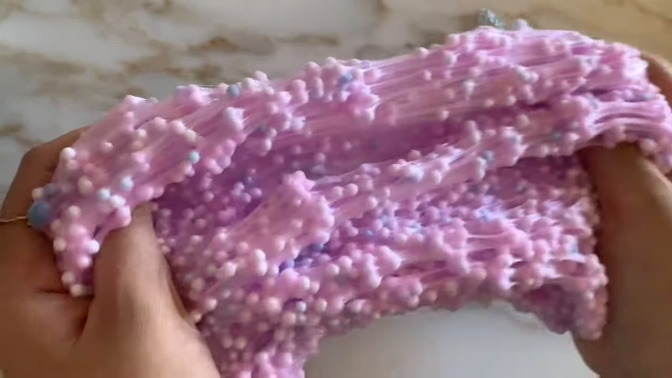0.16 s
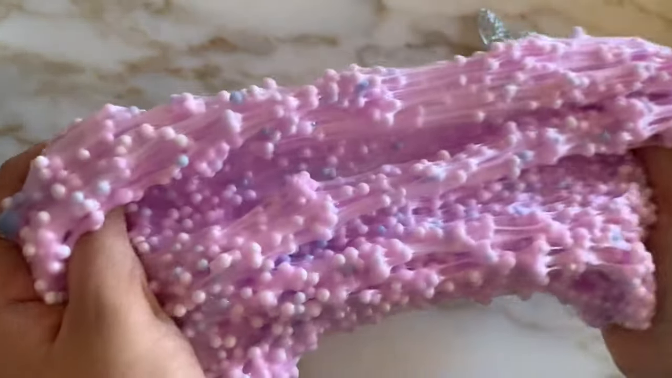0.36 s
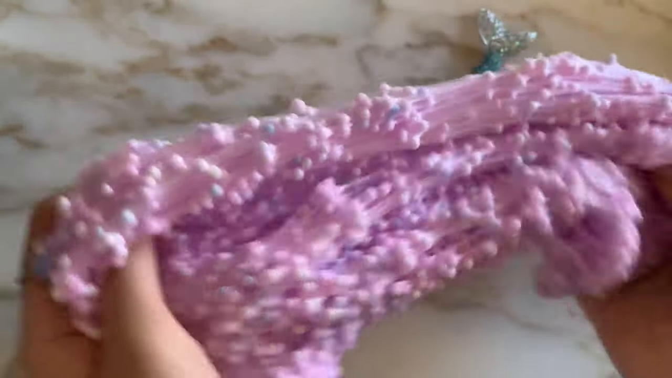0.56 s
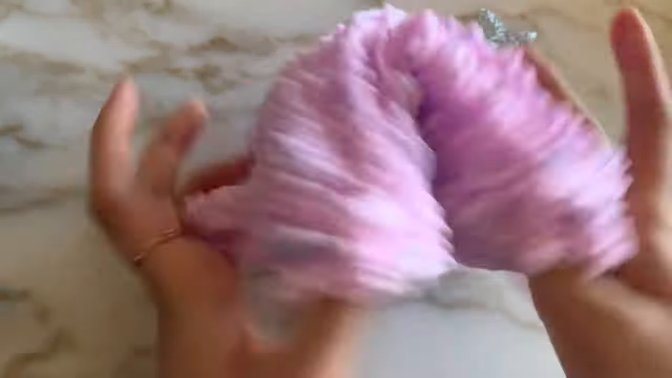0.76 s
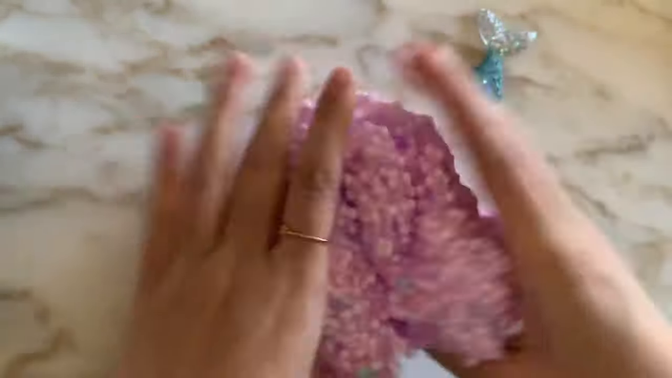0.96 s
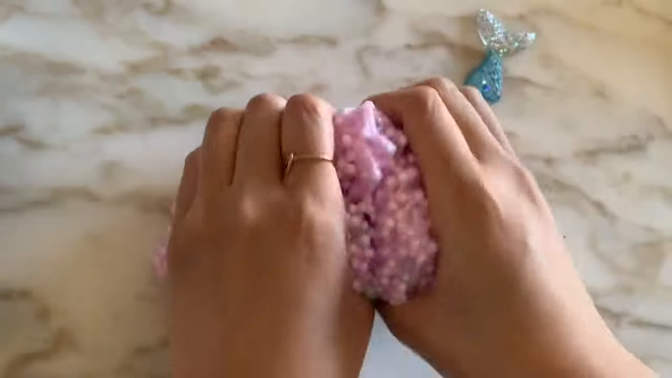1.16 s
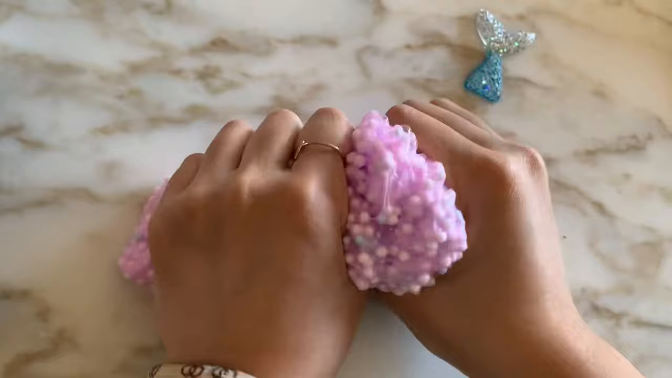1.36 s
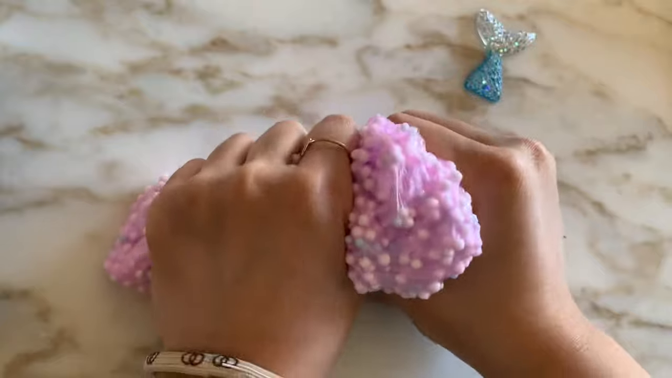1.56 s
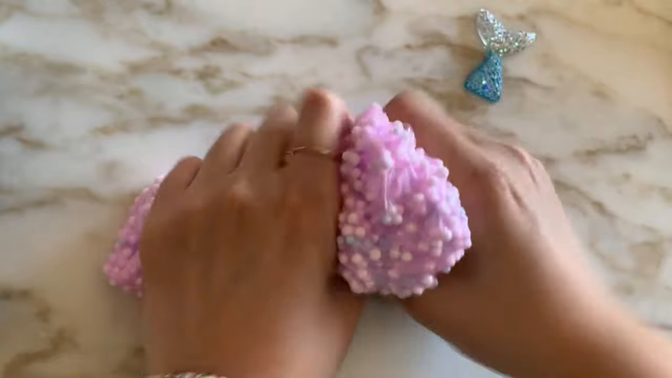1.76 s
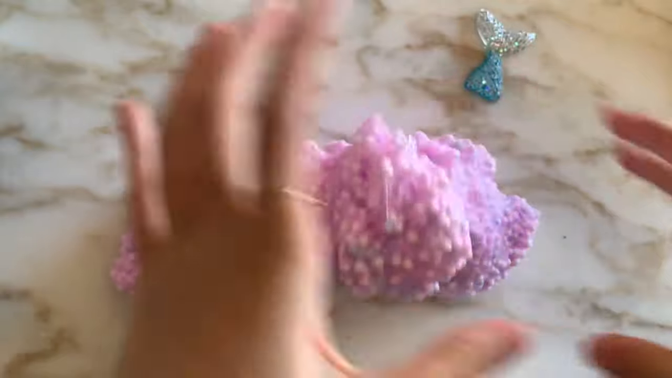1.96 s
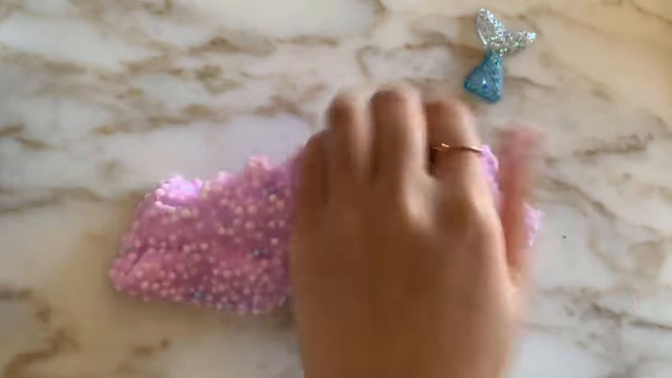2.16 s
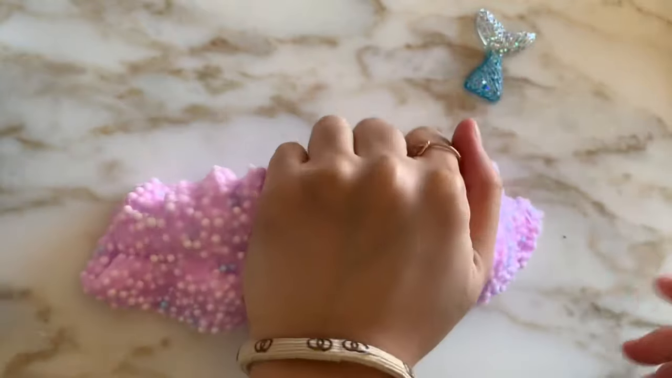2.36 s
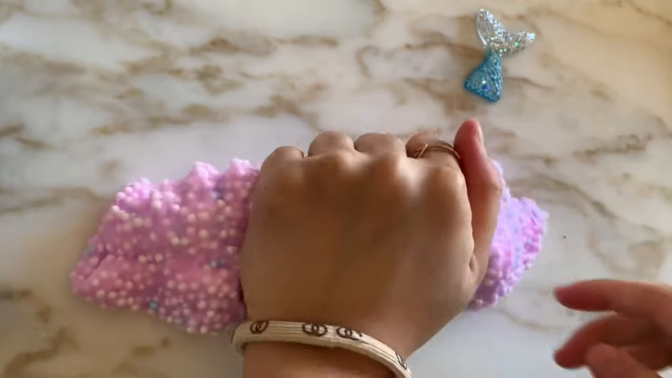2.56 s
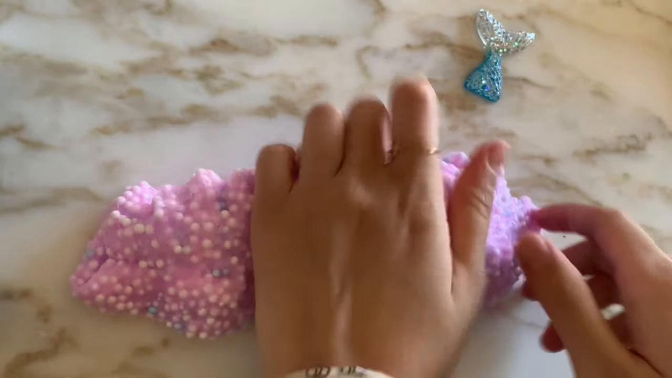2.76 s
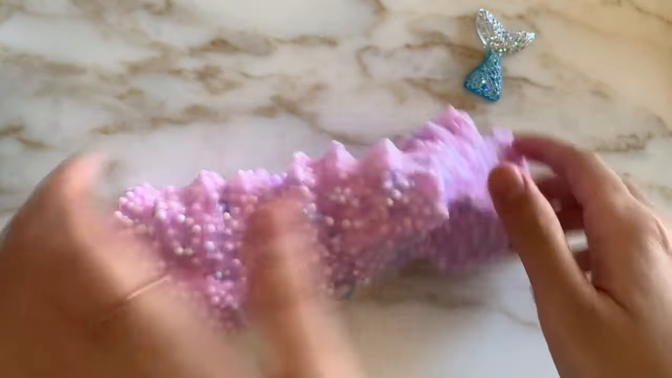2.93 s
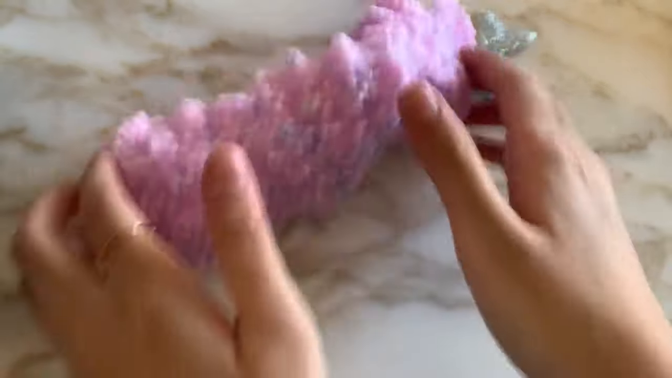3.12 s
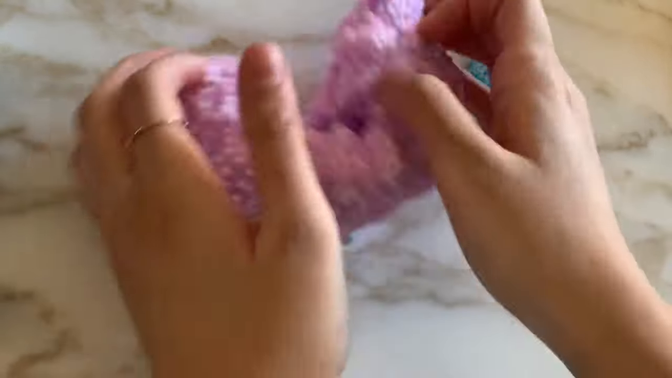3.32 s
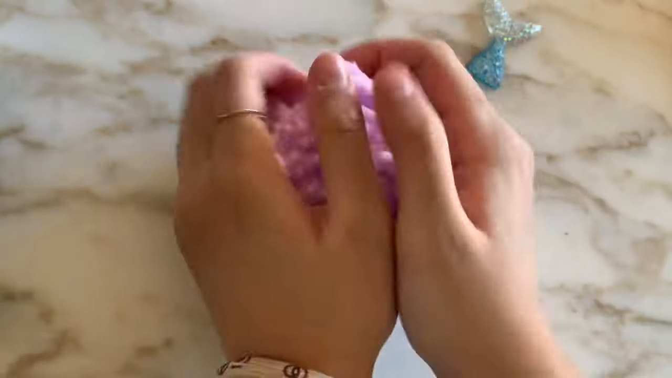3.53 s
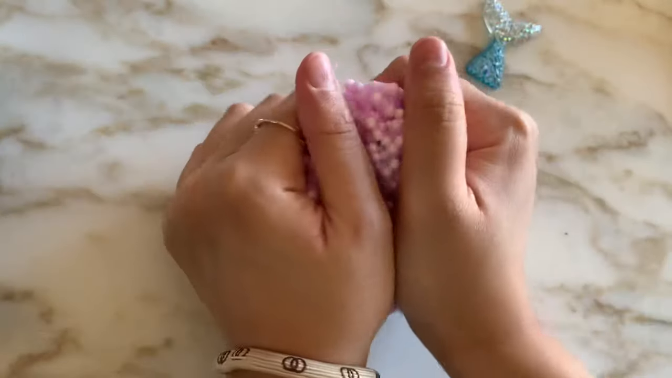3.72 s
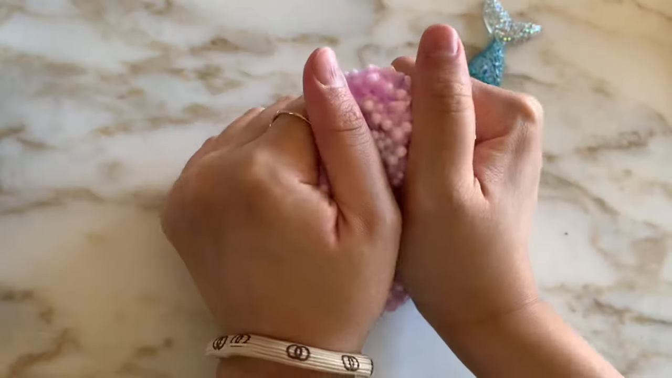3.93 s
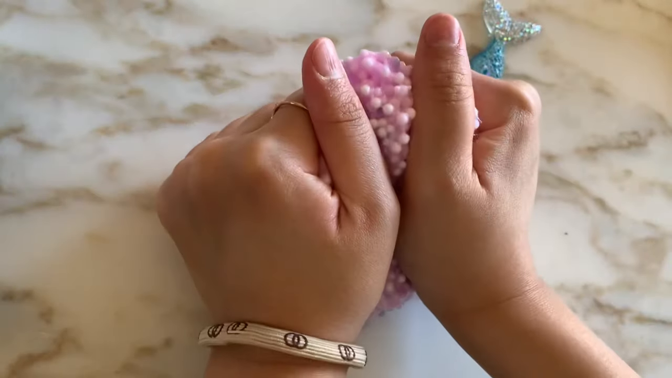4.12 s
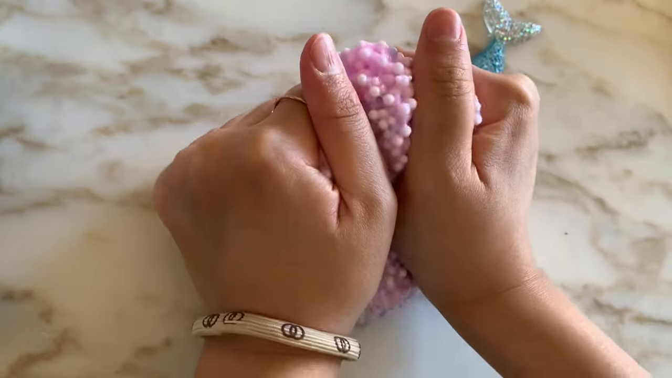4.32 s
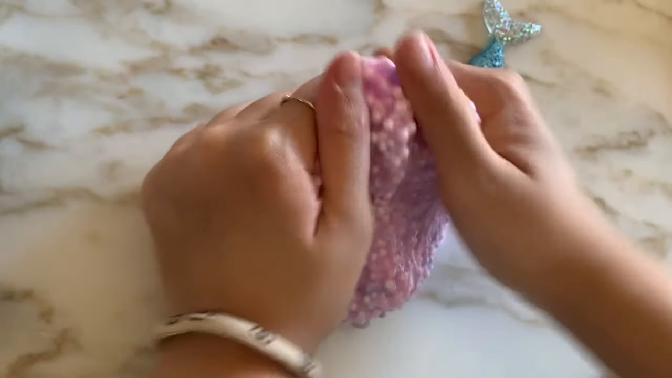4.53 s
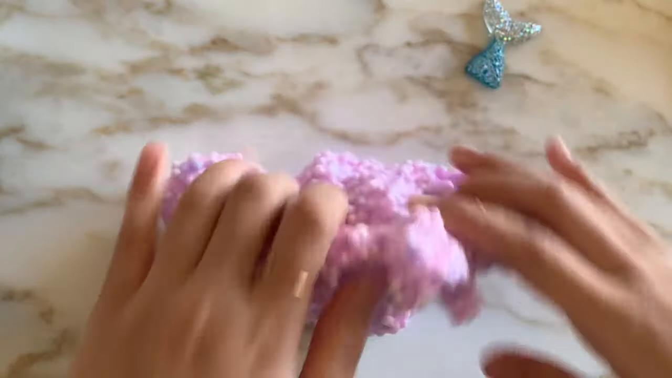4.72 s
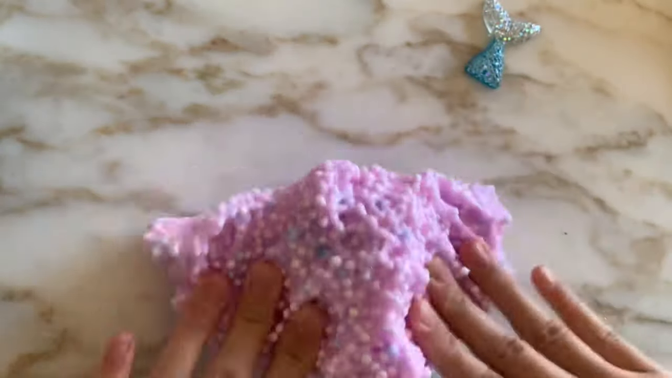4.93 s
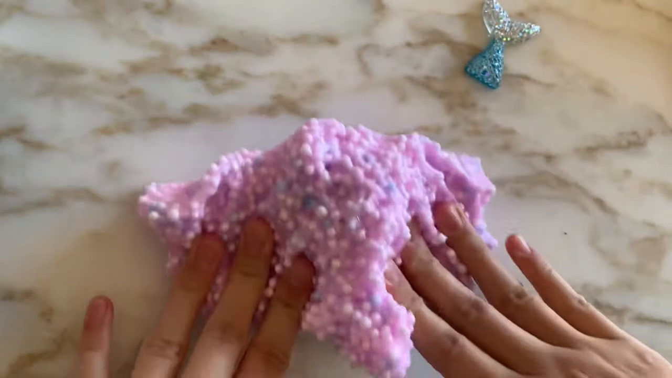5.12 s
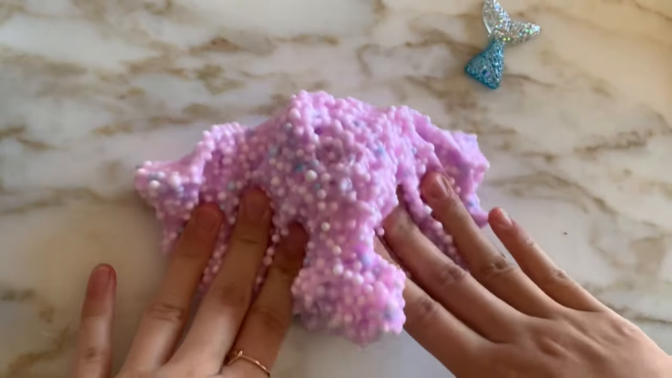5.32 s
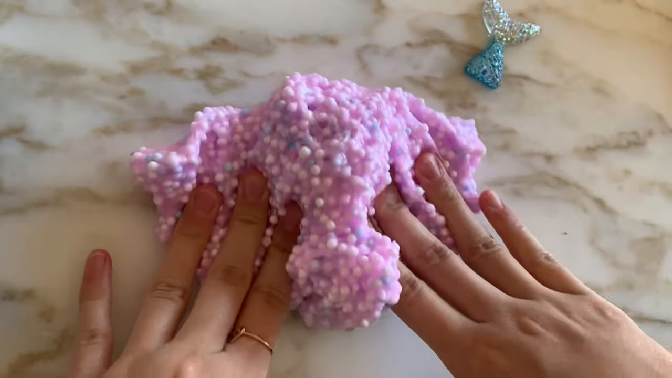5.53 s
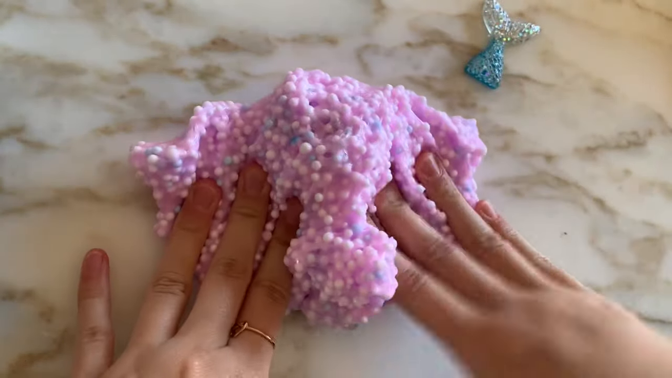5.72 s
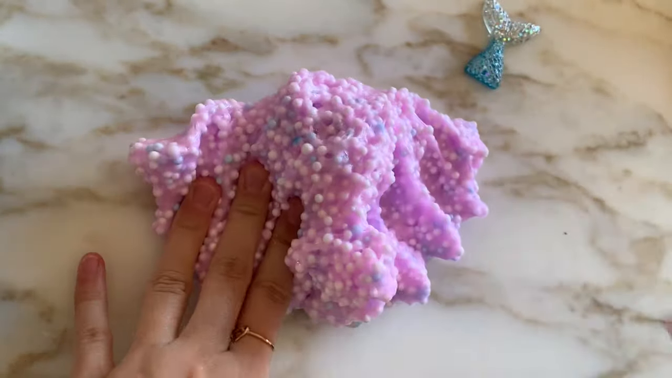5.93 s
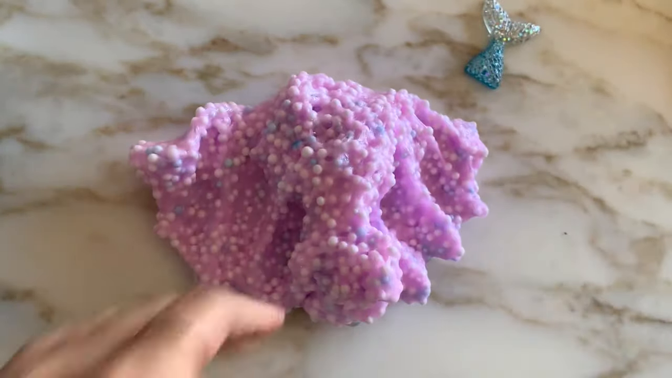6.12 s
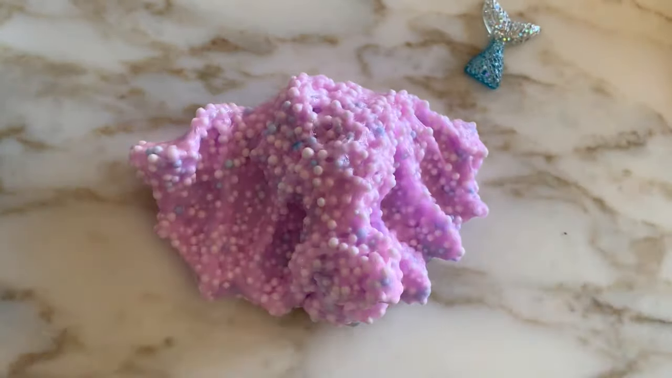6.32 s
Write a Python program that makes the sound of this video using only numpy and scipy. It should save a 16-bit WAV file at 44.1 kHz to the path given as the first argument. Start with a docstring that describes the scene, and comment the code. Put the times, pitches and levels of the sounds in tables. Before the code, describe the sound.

Very close to the microphone, hands stretch and squeeze foam-bead slime on a stone counter. A lone pop and soft stretching crackle lead to a short fizz, then a dense, loud crunch full of sharp pops. Further squeezes snap and crackle in bursts, with a soft thud as the lump is lifted. Pokes end in small fizzes over a faint low room rumble.

```python
"""Sharp falling chirps, fine crackle and dense fizz: hands knead foam-bead slime on a stone counter, heard close up.
Trapped air bursts as short damped oscillations of falling pitch, and beads unstick in sparse random snaps.
Peeling, rubbing and settling slime fizzes as a denser swarm of tiny bursts; both swell and fade with each move.
The lump bumps as decaying modes when lifted; behind it a small room rumbles with filtered noise and hums with sines."""
import sys
import numpy as np
from scipy import signal
from scipy.fft import rfft, irfft, next_fast_len
from scipy.io import wavfile
from scipy.ndimage import uniform_filter1d, map_coordinates

SR = 44100
rng = np.random.default_rng(int(sys.argv[2]) if len(sys.argv) > 2 else 0)


def transcribe(u):
    """Save the signal u as a 16-bit wav file named by the first command-line argument.

    u: samples, shape (n,) or (channels, n), limited to [-1, 1]; the rate is SR.
    q: integer samples, one column per channel.
    """
    v = np.clip(np.atleast_2d(u).T, -1, 1)
    q = np.round(v * 32767).astype(np.int16)
    wavfile.write(sys.argv[1], SR, q)


N = 285768
MAX_PITCH_HZ = SR * 0.42  # ceiling for randomly drawn starting pitches


def amp(db):
    """Level to amplitude: 20 dB is a factor of ten."""
    return 10 ** (np.asarray(db) / 20)


def unit(x):
    """Normalisation to an rms of 1."""
    return x / np.sqrt(np.mean(x ** 2) + 1e-20)


def along(points, hz):
    """Interpolation of (frequency, value) points on a logarithmic frequency axis."""
    f, v = np.transpose(points)
    return np.interp(np.log(hz + 1), np.log(f + 1), v)


def curves(rows):
    """Linear interpolation in time: one value per sample for each column after the time."""
    s, *columns = np.transpose(rows)
    return [np.interp(np.arange(N) / SR, s, column) for column in columns]


def wobble(rate):
    """Slow random modulation: a smooth curve through rate random knots a second."""
    knots = rng.standard_normal(int(N * rate / SR) + 4)
    return map_coordinates(knots, [np.arange(N) * rate / SR])


def filtered(x, response):
    """Linear filtering: the spectrum is multiplied by a response of frequency."""
    m = next_fast_len(N + SR // 2)
    return irfft(rfft(x, m) * response(np.fft.rfftfreq(m, 1 / SR)), m)[:N]


def coloured(x, gains):
    """Spectral shaping by (frequency_hz, gain_db) points."""
    return filtered(x, lambda hz: amp(along(gains, hz)))


def steady(x, size=1500):
    """Running-power normalisation to an rms near 1; single snaps still stand out."""
    power = uniform_filter1d(uniform_filter1d(x ** 2, size), size)
    return x / np.sqrt(np.abs(power) + 1e-6 * np.mean(x ** 2))


def bursts(s, db, hz, life, glide=2.49, fade=0.004, size=260):
    """Damped bubble oscillation: pitch falls steeply; decay follows cycles (life) and time (fade, s)."""
    t = np.arange(size) / SR
    cycles = glide * np.log1p(hz[:, None] * t / glide)
    decay = np.exp(-cycles / life[:, None] - t / fade)
    onset = 1 - np.exp(-cycles / .5)
    shape = np.sin(2 * np.pi * cycles) * decay * onset
    gain = amp(db) * rng.choice([-1, 1], len(s))
    at = np.round(np.abs(s) * SR).astype(int)[:, None] + np.arange(size)
    return np.bincount(at.ravel(), (gain[:, None] * shape).ravel(), N)[:N]


def swarm(rate, hz, spread, scatter_db, life, size):
    """Random superposition of bubbles, rate a second, scattered in pitch, strength and damping."""
    count = int(rate * N / SR)
    pitch, strength, damping = rng.standard_normal((count, 3)).T
    pitch_hz = np.minimum(hz * np.exp(spread * pitch), MAX_PITCH_HZ)
    level_db = scatter_db * np.minimum(strength, 2.6)
    start_s = rng.uniform(0, N / SR, count)
    return bursts(start_s, level_db, pitch_hz, life * np.exp(.3 * damping), size=size)


def background(air_db=-49.0, waver=0.3):
    """Broadband and tonal noise: low ventilation rumble, and appliance hum with phase wavering (rad)."""
    # spectrum of the room air: frequency_hz, gain_db
    air_gains = [(20, -29), (42, -11), (55, 0.5), (120, -3.5), (160, -5), (280, -9), (380, -18), (560, -19),
                 (900, -27.5), (1450, -30), (1900, -42), (4000, -58), (16000, -57)]
    # lines of the appliance hum: frequency_hz, rms level_db
    hum_lines = [(70, -58.5), (87, -60.5), (120, -62), (295, -62)]
    t = np.arange(N) / SR
    hum = np.zeros(N)
    for hz, db in hum_lines:
        hum += amp(db) * np.sqrt(2) * np.sin(2 * np.pi * hz * t + waver * wobble(5))
    return hum + amp(air_db) * unit(coloured(rng.standard_normal(N), air_gains))


def room(x):
    """Reverberation: exponentially decaying noise whose upper treble dies first, 5 ms late."""
    # decay of the room: frequency_hz, t60_s
    decay_times = [(200, 0.22), (2000, .27), (6000, 0.17), (15000, 0.069)]
    hz, t, z = signal.stft(rng.standard_normal(SR // 2), SR, nperseg=256)
    decay = amp(-60 * t / along(decay_times, hz)[:, None])
    tail = signal.istft(z * decay, SR, nperseg=256)[1]
    late = np.pad(x, (SR // 200, 0))
    return signal.fftconvolve(late, tail / np.linalg.norm(tail))[:N]


def bumps(attack=0.0018):
    """Modal vibration: each soft bump as the lump is lifted rings briefly, damped by the slime."""
    # soft bumps of the lump: start_s, level_db
    lift_bumps = [(2.9348, -23), (2.963, -31), (2.974, -34), (3.076, -32.5)]
    # modes of the lump: frequency_hz, level_db, t60_s
    lump_modes = [(229, -1.5, 0.036), (409, -2, 0.045), (470, -4, 0.032)]
    out, t = np.zeros(N + SR), np.arange(SR // 8) / SR
    ring = sum(amp(db - 60 * t / t60) * np.sin(2 * np.pi * hz * t) for hz, db, t60 in lump_modes)
    ring = ring * (1 - np.exp(-t / attack))
    for s, db in lift_bumps:
        out[round(s * SR):][:len(t)] += amp(db) * ring
    return out[:N]


def counter(x, delay=.0022, drift=.35, bounce=0.33):
    """Reflection from the stone: a copy some 2 ms late interferes, its delay drifting as the hands move."""
    late = delay * np.exp(drift * wobble(4)) * SR
    reflection = map_coordinates(x, [np.arange(N) - late])
    return (x + bounce * reflection) / np.hypot(1, bounce)


def patchy(x, depth_db):
    """Acoustic shading: folds shade and open the way out, so the colour shifts from moment to moment."""
    z = signal.stft(x, nperseg=256)[2]
    field = rng.standard_normal(z.shape)
    field = uniform_filter1d(uniform_filter1d(field, 7, 0), 5, 1)  # smooth in frequency, then time
    return signal.istft(z * amp(depth_db * unit(field)), nperseg=256)[1][:N]


def hollow(x, hollow_hz, width=0.85, leak=.3):
    """Cavity resonance: one broad peak moves as the hands close and open; some sound leaks past."""
    hz, t, z = signal.stft(x, SR, nperseg=256)
    ratio = (hz[:, None] + 1) / np.interp(t, np.arange(N) / SR, hollow_hz)
    resonance = 1 / (1 + 1j * (ratio - 1 / ratio) / width)
    return signal.istft(z * (leak + resonance), SR, nperseg=256)[1][:N]


def handwork():
    """Effort envelopes: moves swell, hold and let go, dulling as they fade; power weights overlaps."""
    # pulls and squeezes that crackle (levels relative, hollow_hz is the cavity under the hand):
    # full_effort_s, hold_s, fall_s, level_db, brightness_db, squelch_db, hollow_hz
    squeezes = [(0.0, 0.13, 0.43, -53.5, -4, -4, 1030), (0.262, .07, 0.22, -56, -2, -2, 1000),
                (0.7, 0.13, 0.9, -54, -1, -3, 1560), (1.056, 0.048, .055, -44, -2, 6.5, 1600),
                (1.159, 0.037, 0.28, -33, -4, -3, 1380), (1.298, .015, .12, -37, -6, 1.5, 1370),
                (1.454, 0.083, 0.14, -37, -6.5, -7.5, 1320), (2.193, 0.017, 0.24, -34.5, -3.5, -10, 920),
                (2.331, 0.0098, 0.032, -44, 2.5, 5, 910), (2.39, .11, 0.18, -44, -3, -7.5, 920),
                (2.805, 0.19, 0.52, -52.5, -4, -2.5, 1120), (3.22, .18, 0.29, -51.5, 0.5, 1, 1797),
                (3.535, 0.21, 0.28, -39, -4, -12, 1710), (3.882, 0.24, 0.18, -49.5, 1.5, -14, 1600),
                (4.262, 0.04, 0.14, -51.5, -4, -12, 1500), (4.716, 0.17, 0.32, -47.5, -0.5, -5.5, 1385),
                (4.994, 0.19, 0.39, -53.5, -5, -7, 1060), (5.375, 0.066, 0.18, -60, -8, -3, 910)]
    # dense fizz of peeling, rubbing and settling slime:
    # full_effort_s, hold_s, fall_s, level_db, brightness_db, squelch_db, hollow_hz, rise_s
    fizzes = [(0.5, 0.041, 0.054, -35.5, -2, -8.5, 1010, 0.098),
              (0.593, 0.032, 0.084, -42.5, -1, -5.5, 1110, 0.1),
              (1.337, 0.078, 0.17, -34.5, -9, -11, 1370, 0.18),
              (1.727, 0.072, .055, -35, -3, -0.5, 1160, 0.089), (1.837, .01, 0.6, -52, -5, -7.5, 1100, .05),
              (2.736, 0.01, 0.069, -39, 1.5, 2, 820, 0.12), (3.208, 0.039, .04, -58, -11, -6, 2800, 0.034),
              (4.405, 0.11, 0.2, -42, -3.5, -7, 890, 0.014), (4.561, 0.084, 0.13, -42, 1.6, 1, 920, 0.14),
              (5.701, 0.035, 0.055, -42, -4, 0, 668, 0.022),
              (5.995, .02, 0.043, -37.5, -2, -3.5, 662, 0.035)]
    squeeze_rise_s = 0.088  # rise, fall and settling times each span 20 dB
    squeeze_share, fizz_share = 0.84, 0.32  # power share of separate snaps, 0-1
    settle_db, settle_s = -23.5, 0.39  # the foam fizzes on faintly after each move
    rise_curve = 1.2  # a move sets in abruptly, then levels off
    dulling = .35  # extra dB of treble lost for each dB that the effort drops

    t = np.arange(0, N / SR, .002)
    moves = [(*row, squeeze_rise_s, squeeze_share) for row in squeezes]
    moves += [(*row, fizz_share) for row in fizzes]
    s, hold, fall, db, bright_db, squelch_db, hollow_hz, rise, share = np.transpose(moves)[..., None]
    before, after = np.maximum(s - t, 0), np.maximum(t - s - hold, 0)
    swell_db = -20 * (before / rise) ** rise_curve
    release_db = np.maximum(-20 * after / fall, settle_db - 20 * after / settle_s)
    effort_db = swell_db + release_db
    power = amp(db + effort_db) ** 2 + 1e-16

    def level(offset_db):
        """Incoherent addition: the powers of all moves sum."""
        return 10 * np.log10((power * amp(offset_db) ** 2).sum(0) + 1e-16)

    def blend(value):
        """Power-weighted mean: the louder move sets the colour."""
        return (power * value).sum(0) / power.sum(0)

    sparkle_db = level(bright_db + dulling * effort_db)
    snap_share = np.clip(blend(share), 0, 1)
    return curves(np.transpose([t, level(0), sparkle_db, level(squelch_db), snap_share, blend(hollow_hz)]))


def strays(crackle_db, share, hz=11500, spread=.45, scatter_db=4, life=1.2):
    """Random bubble bursts: small pockets open unbidden, louder with crackle level and snap share."""
    rate_per_s, over_crackle_db = 40, 21
    count = int(rate_per_s * N / SR)
    at = rng.integers(0, N, count)
    pitch, strength, damping = np.clip(rng.standard_normal((count, 3)), -2, 2).T
    effort_db = crackle_db[at] + 20 * np.log10(share[at] + 1e-6)
    level_db = effort_db + over_crackle_db + scatter_db * strength
    pitch_hz = np.minimum(hz * np.exp(spread * pitch), MAX_PITCH_HZ)
    return bursts(at / SR, level_db, pitch_hz, life * np.exp(.4 * damping))


def kneading(crackle_db, sparkle_db, squelch_db, share, hollow_hz):
    """Granular noise: sparse bead snaps and dense fizz; closing folds add larger, duller bubbles."""
    # colours of the low squelch, middle crackle and high sparkle bands, each: frequency_hz, gain_db
    squelch_gains = [(100, -30), (250, -3.5), (430, 7), (700, 3.5), (1400, -8.5), (2100, -10),
                     (3200, -15.5), (8000, -63)]
    crackle_gains = [(500, -49.5), (1400, -9.5), (2300, -10), (4000, -3.5), (6500, -4), (8500, -12),
                     (14000, -41.5)]
    sparkle_gains = [(2000, -47.5), (5500, -16.5), (7500, -10), (11000, -3.5), (14000, -0.5), (16000, -5)]
    fold_share = 0.55  # power share of folds in the squelch where the snap share is 1
    snaps = swarm(rate=800, hz=10850, spread=.55, scatter_db=6.5, life=1.6, size=160)
    snaps = patchy(snaps, depth_db=3.5)
    fizz = swarm(rate=4500, hz=9960, spread=0.697, scatter_db=4.0, life=2.8, size=90)
    fizz = patchy(fizz, depth_db=2.0)
    folds = swarm(rate=320, hz=1990, spread=0.54, scatter_db=4.5, life=1.76, size=260)

    def grain(gains):
        """Shared excitation: the same bursts sound in every band, so each is one broad click."""
        sparse = np.sqrt(share) * steady(coloured(snaps, gains))
        dense = np.sqrt(1 - share) * steady(coloured(fizz, gains))
        return sparse + dense

    big = np.clip(fold_share * share, 0, 1)
    wet = np.sqrt(1 - big) * grain(squelch_gains) + np.sqrt(big) * steady(coloured(folds, squelch_gains))
    squelch = amp(squelch_db - 1.0) * steady(hollow(wet, hollow_hz))
    crackle = amp(crackle_db - 5) * grain(crackle_gains)
    sparkle = amp(sparkle_db) * grain(sparkle_gains)
    return squelch + crackle + sparkle


def lump(x, centre_hz=310, width_hz=170, body_db=7):
    """Driven resonance: bursts also shake the soft mass, which answers with a dull thud."""
    def response(f):
        """Damped resonator followed by a roll-off around 700 Hz."""
        resonance = 1j * f * width_hz / (centre_hz ** 2 - f ** 2 + 1j * f * width_hz)
        return resonance / (1 + (f / 700) ** 2)
    return x + amp(body_db) * filtered(x, response)


def pops(scatter_db=-9, scatter_t60=0.0099, tick_gain_db=-21, lead_s=0.0014, growth_db=3, size=500):
    """Bursting and scattering: faint ticks lead each pop, which scatters off fingers and counter."""
    # loudest air pockets, led at 0.07 s by a clicking bead: start_s, level_db, starting pitch_hz, life_cycles
    # (decay to 1/e)
    air_pockets = [(0.0703, -1.5, 8700, 0.76), (0.0712, -23.5, 1140, 1), (0.2153, -22.5, 5200, 1.1),
                   (0.2595, -23.5, 1330, 0.77), (0.3184, -30.5, 1410, 1.2), (1.0034, -6, 17300, 1.3),
                   (1.0056, -14, 2370, 1.2), (1.0456, -19.5, 15500, 8.1), (1.0833, 1, 17600, 1.5),
                   (1.0864, -14, 4500, 3), (1.107, -12, 1830, 0.88), (1.1143, -7.5, 1820, 0.88),
                   (1.121, 3, 13700, 1.56), (1.1682, -6, 14900, 6.4), (1.181, -13.5, 7900, 5.2),
                   (1.277, -3, 8600, 8.1), (1.2973, -2, 2580, 1.0), (1.3052, 4.5, 11200, 2),
                   (1.3754, -3.5, 3840, 3.5), (1.3877, 3, 17300, 1.7), (1.393, 2, 17400, 2.5),
                   (1.45, 0, 13800, 3.24), (1.501, 1, 14200, 2.35), (2.1637, -17.0, 7700, 4.1),
                   (2.1945, -4.5, 6740, 2.44), (2.3113, 3.5, 12300, 1.4), (2.3303, -11.5, 11400, 4.8),
                   (2.336, -0.5, 13800, 1.96), (2.3895, -4, 15000, 3.7), (2.5098, -20.5, 7360, 8.1),
                   (2.5331, -15.0, 9350, 2.75), (3.209, -25, 4600, 2), (3.2435, -21, 3530, 1.4),
                   (3.248, -10, 17200, 1.6), (3.3057, -19, 17300, 3.7), (3.464, -13, 16900, 3.6),
                   (3.5468, -12, 16100, 3.3), (3.61, -12.5, 15200, 2.8), (3.6648, -1, 11100, 1.2),
                   (3.7658, -10.5, 17400, 2.7), (3.7768, -10.5, 12800, 3.2), (3.9052, -2.5, 17700, 1.64),
                   (4.0339, -0.5, 17500, 1.88), (4.2118, -2.0, 9000, 1.13), (4.2515, -14, 8400, 2.04),
                   (4.2985, -15.5, 17600, 2.3), (4.3654, -27, 6700, 1.2)]
    # loudest beads snapping free: start_s, level_db, starting pitch_hz
    bead_snaps = [(0.1553, -11, 12000), (0.608, -5.5, 9200), (1.1467, 3, 13600), (1.1549, 2, 7900),
                  (1.241, -1.5, 17400), (1.374, 0.5, 17300), (1.4607, -7, 8400), (2.1887, 5, 12200),
                  (2.2064, 5, 7200), (2.297, -3, 16300), (2.4168, -5.5, 14400), (2.4463, -3, 15500),
                  (2.642, -10, 14400), (3.0155, -14.5, 12000), (3.2029, -6.5, 17500), (3.2894, -3.5, 17300),
                  (3.643, -2.5, 6900), (3.7368, -2, 5360), (3.8096, -0.5, 15400), (3.827, 3.5, 16300),
                  (3.8425, -4.5, 7600), (3.9354, 7, 16300), (3.9412, 8.5, 17300), (3.9994, 7.5, 15200),
                  (4.012, -6.5, 16800), (4.0848, 6.0, 17700), (4.2305, -2.5, 17300), (4.7502, -10, 13000),
                  (4.834, -15, 14400), (4.8692, -12, 12000), (4.9227, -15, 7360), (5.0163, -6.5, 14100),
                  (5.121, -13.5, 16700), (5.1592, -16, 7800), (5.21, -14, 17600), (5.3665, -20.0, 7900)]
    snap_cycles = 0.78  # a snap decays to 1/e within one cycle
    out, t = np.zeros(N + size), np.arange(size) / SR
    events = air_pockets + [(*row, snap_cycles) for row in bead_snaps]
    for s, db, hz, life in events:
        direct = bursts(np.zeros(1), np.array([db]), np.array([hz]), np.array([life]))[:size]
        paths = rng.standard_normal(size) * amp(-60 * t / scatter_t60) * (1 - np.exp(-t / 0.00054))
        echo = signal.fftconvolve(direct, paths / np.linalg.norm(paths))[:size]
        out[round(s * SR):][:size] += direct + amp(scatter_db) * echo

    # three faint random ticks just before each pop, stronger for longer-lived pops
    s, db, hz, life = np.repeat(events, 3, axis=0).T
    lead, strength, pitch = rng.standard_normal((len(s), 3)).T
    tick_s = s - lead_s * np.exp(0.61 * lead)
    tick_db = db + tick_gain_db + growth_db * np.log2(life) + 3 * strength
    tick_hz = np.minimum(hz * np.exp(.3 * pitch), MAX_PITCH_HZ)
    return out[:N] + bursts(tick_s, tick_db, tick_hz, np.minimum(life, 1.2))


def scene():
    """Superposition: the hands work the slime on the counter, in a small humming room."""
    crackle_db, sparkle_db, squelch_db, share, hollow_hz = handwork()
    crunch = kneading(crackle_db, sparkle_db, squelch_db, share, hollow_hz) + strays(crackle_db, share)
    slime = lump(pops()) + counter(crunch) + bumps()
    return (slime + amp(-21) * room(slime) + background())[None]


def record(dry):
    """Band limiting: a very steep low-pass removes almost everything above its cutoff."""
    cutoff_hz = 16100
    return filtered(dry[0], lambda hz: 1 / np.sqrt(1 + (hz / cutoff_hz) ** 160))[None]


dry = scene()
out = record(dry)
transcribe(out)
```